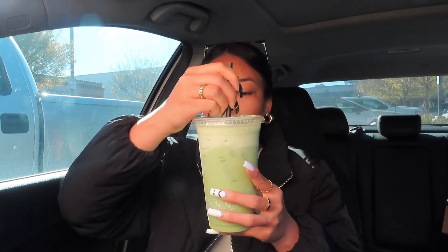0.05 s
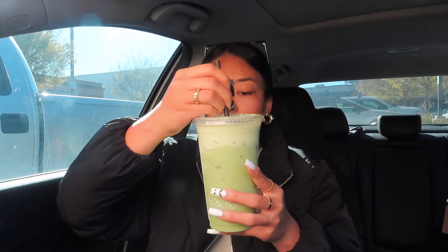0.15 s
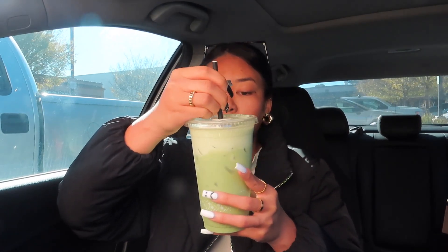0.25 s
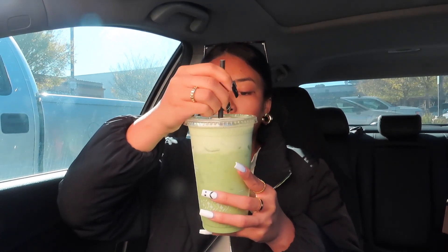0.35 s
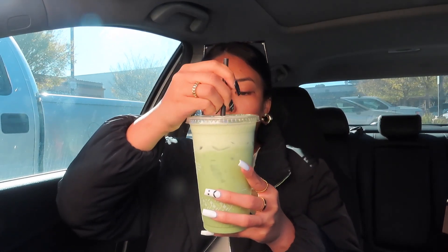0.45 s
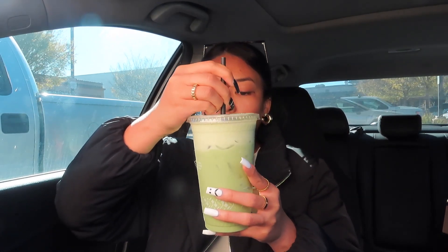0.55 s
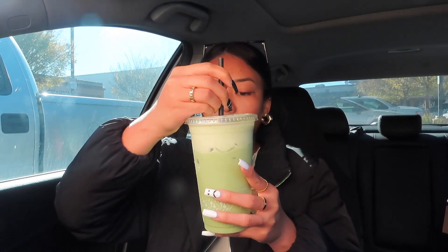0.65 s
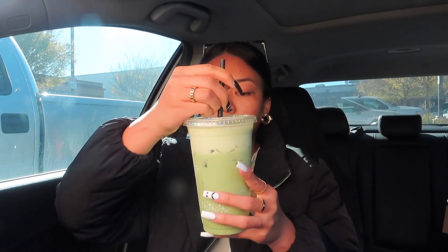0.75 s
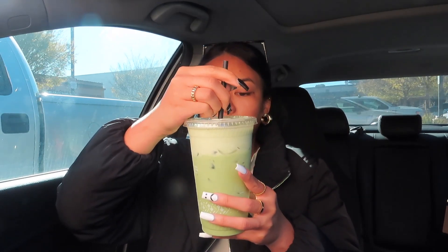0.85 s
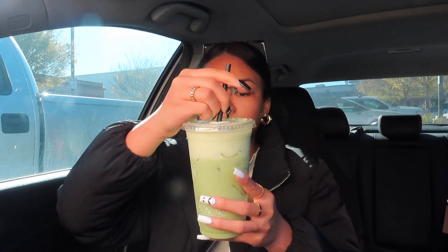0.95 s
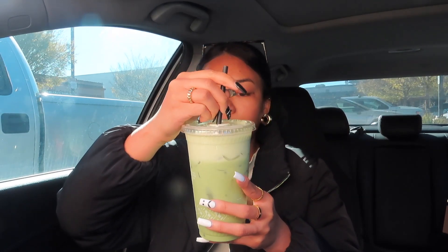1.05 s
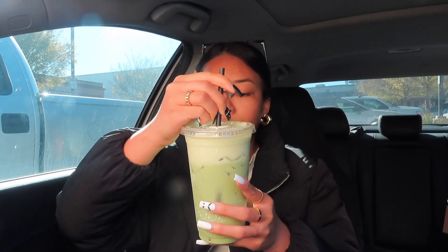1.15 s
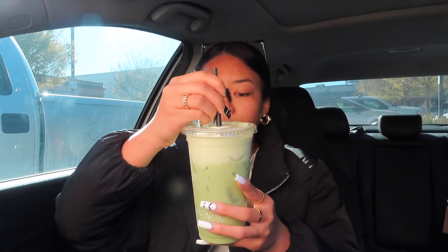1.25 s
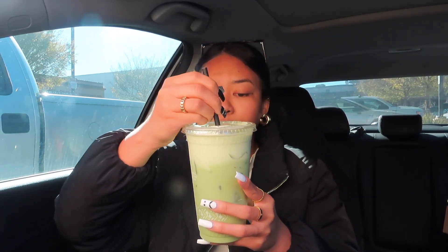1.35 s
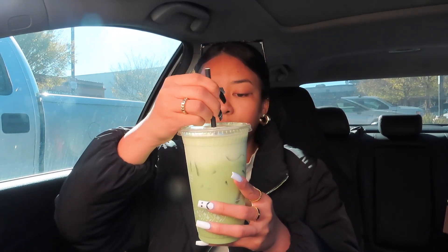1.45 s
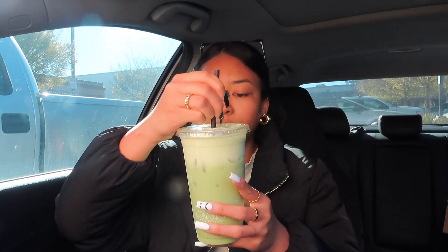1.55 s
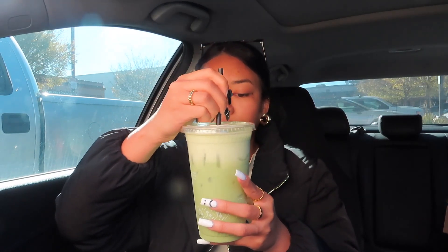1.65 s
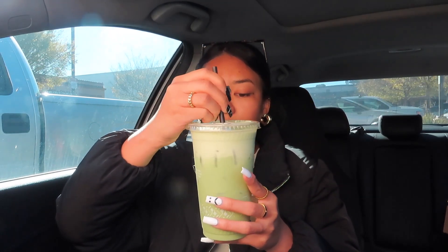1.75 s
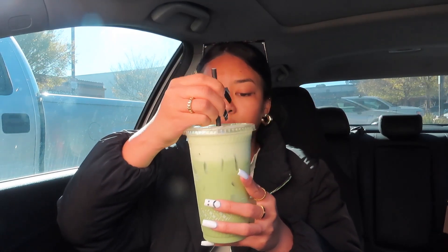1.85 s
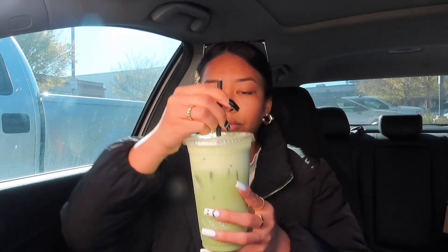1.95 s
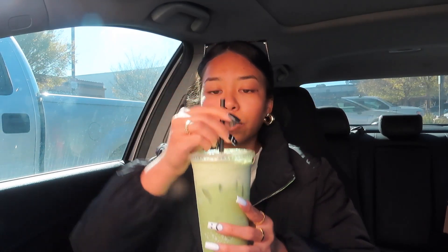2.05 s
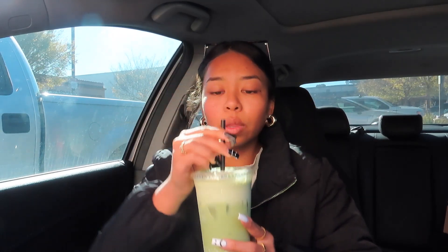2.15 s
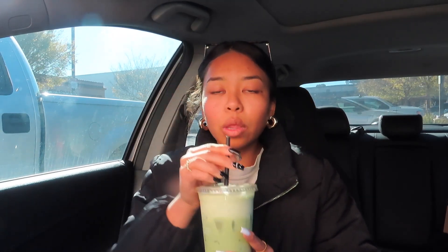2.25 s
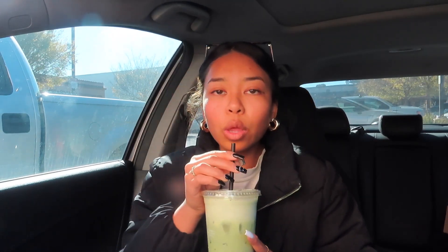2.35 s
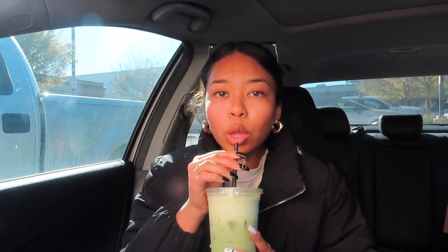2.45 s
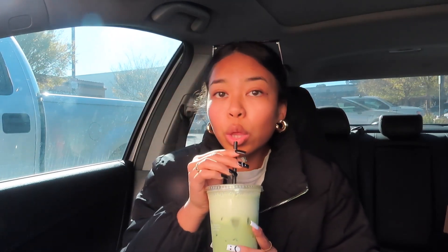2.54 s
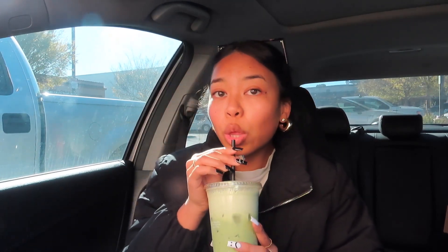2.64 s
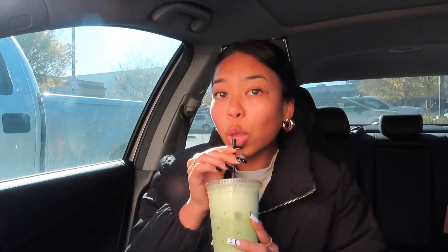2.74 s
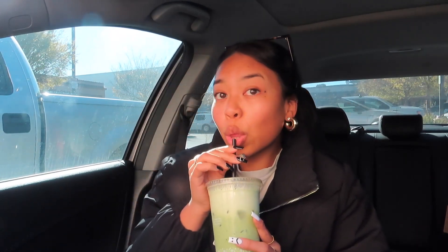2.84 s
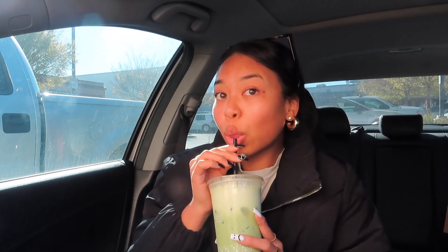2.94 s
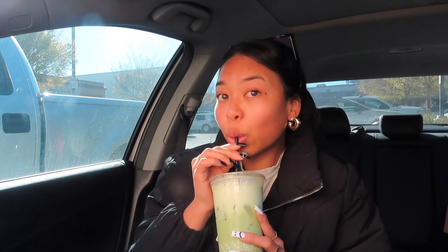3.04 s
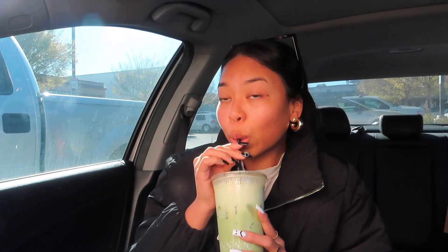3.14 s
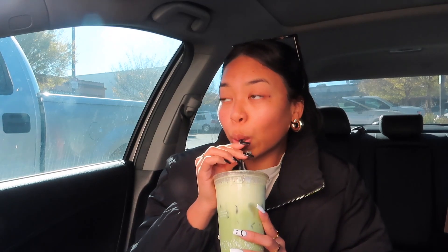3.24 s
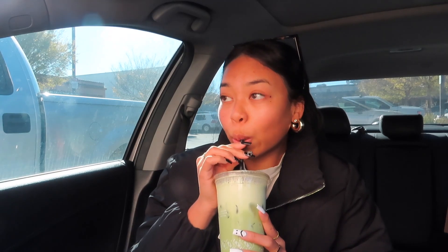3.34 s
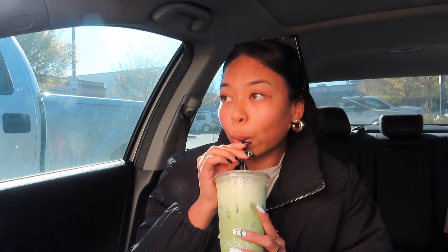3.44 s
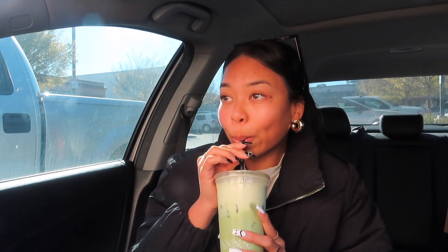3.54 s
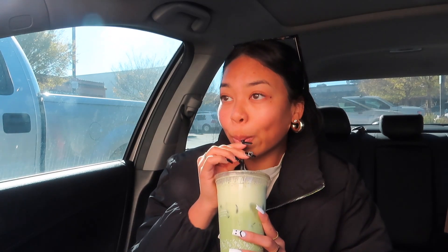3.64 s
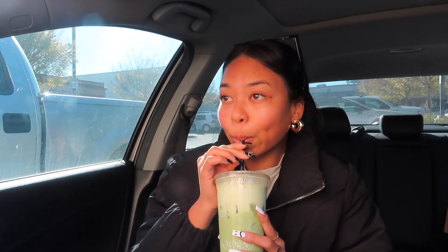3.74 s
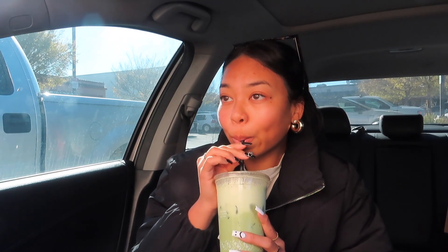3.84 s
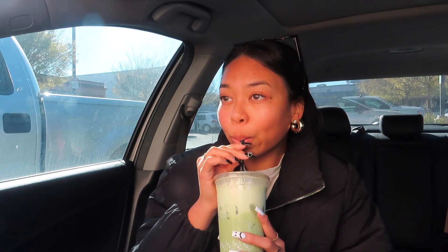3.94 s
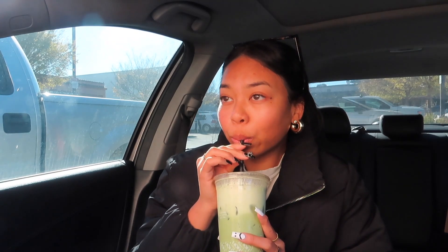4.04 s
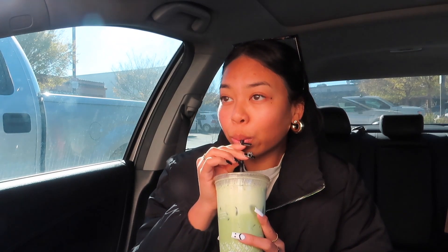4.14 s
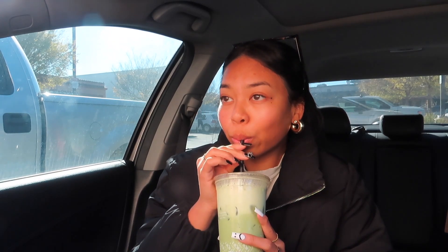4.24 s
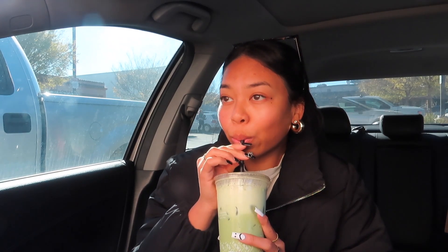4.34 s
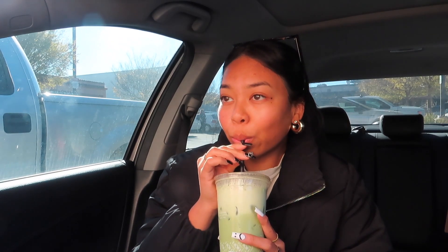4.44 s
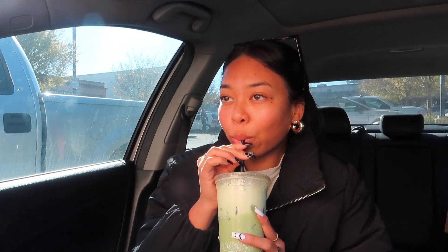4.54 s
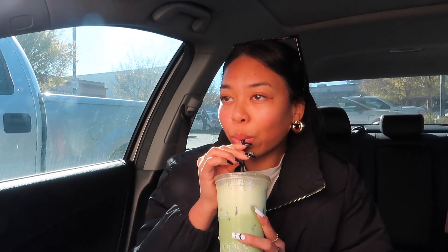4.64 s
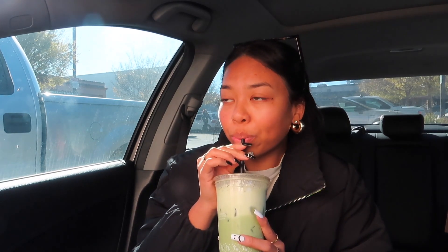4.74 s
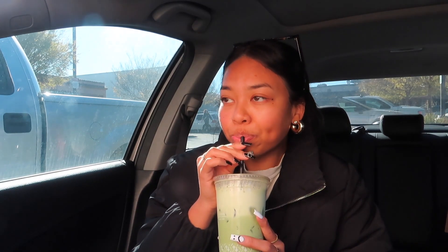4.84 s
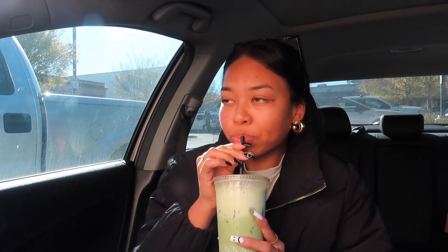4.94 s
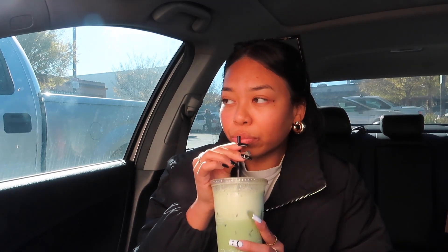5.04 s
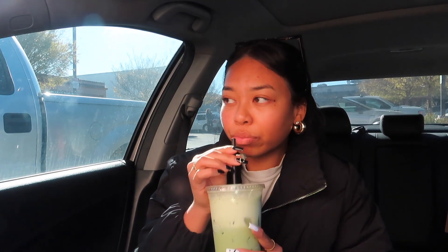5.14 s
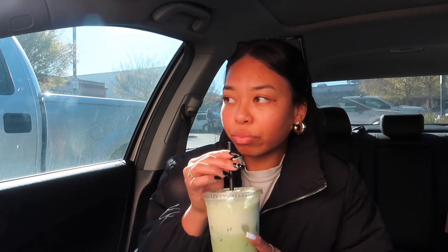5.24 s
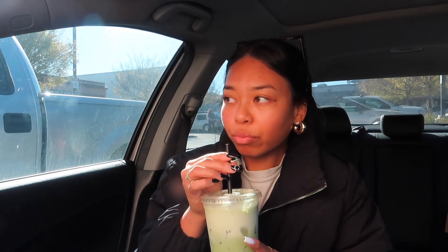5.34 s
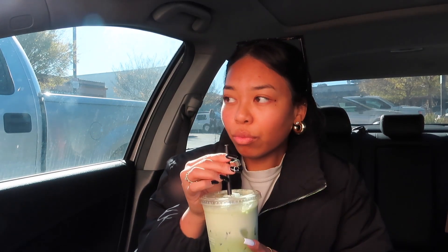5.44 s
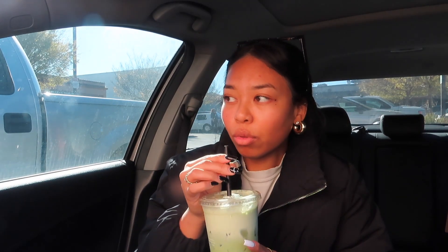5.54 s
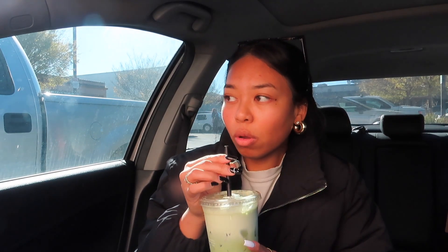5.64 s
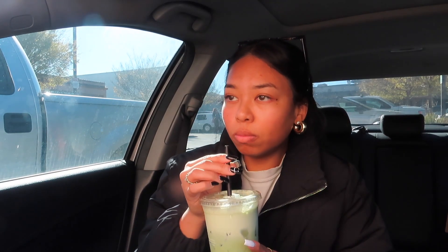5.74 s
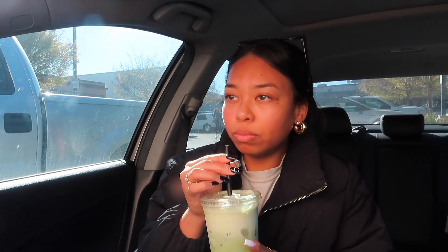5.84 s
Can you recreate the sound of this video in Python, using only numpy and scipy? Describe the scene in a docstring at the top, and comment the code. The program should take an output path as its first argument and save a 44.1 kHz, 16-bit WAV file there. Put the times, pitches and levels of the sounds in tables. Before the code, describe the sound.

Close-up stirring of an iced drink in an idling parked car, with straw creaks, fading ice, then quiet, cloth rustle and lips parting.

```python
"""Stirring an iced drink in an idling car

An iced drink is stirred with a straw in a lidded plastic cup, heard close by in a parked, idling car.
Colliding ice drives resonances of the wall and the lid space; the straw sticks, slips and rings the lid.
The stirring dies away; after a sip, itself silent, the cup is lowered with rustling cloth, damped low
bumps and one more creak, and wet lips part. Engine orders and filtered noise lie beneath it all."""
import sys
import numpy as np
from scipy import signal
from scipy.fft import rfft, irfft, next_fast_len
from scipy.io import wavfile
from scipy.ndimage import uniform_filter1d

SR = 44100
rng = np.random.default_rng(int(sys.argv[2]) if len(sys.argv) > 2 else 0)


def put_to_file(sound):
    """Save the sound as 16-bit audio at rate SR, in the file named by the first command-line argument."""
    columns = np.atleast_2d(sound).T  # one column per channel
    safe = np.clip(columns, -1, 1)
    whole_steps = np.round(safe * 32767)
    wavfile.write(sys.argv[1], SR, whole_steps.astype(np.int16))


N = 259749
TAPS = 4096  # length of a single short sound, in samples
BINS = np.fft.rfftfreq(TAPS, 1 / SR)
TIME = np.arange(N) / SR

# Spectrum of ice rubbing on ice. Each row: frequency in Hz, relative density in dB per Hz.
ICE_SPECTRUM = [(200, -6.5), (700, -5.5), (1300, -3.5), (1800, -2.5), (2050, -4.5), (2800, -2),
                (3500, -3.5), (4500, -8.5), (5600, -13), (7000, -20.5), (8200, -33.5), (11000, -36.5),
                (15500, -66)]


def amp(db):
    """Inverts the level definition: an amplitude ratio is 10 to the power dB / 20."""
    return 10 ** (np.asarray(db) / 20)


def unit(x):
    """Normalizes by the root mean square, to rms 1."""
    return x / np.sqrt(np.mean(x ** 2) + 1e-20)


def read(points, hz):
    """Interpolates a spectrum linearly in value over logarithmic frequency."""
    f, value = np.transpose(points)
    return np.interp(np.log(hz + 1), np.log(f + 1), value)


def add(mix, s, sound):
    """Superposes a sound on the mix from time s in seconds."""
    part = mix[max(round(s * SR), 0):][:len(sound)]
    part += sound[:len(part)]


def colour(x, points):
    """Filters by multiplication in the frequency domain with (Hz, dB) points."""
    size = next_fast_len(len(x) + TAPS)
    gain = amp(read(points, np.fft.rfftfreq(size, 1 / SR)))
    return irfft(rfft(x, size) * gain, size)[:len(x)]


def lifts(rings):
    """Sums the Lorentzian gain in dB of resonances (Hz, width in Hz, lift in dB)."""
    total_db = 0
    for hz, width, db in rings:
        lorentzian = 1 / (1 + (2 * (BINS - hz) / width) ** 2)
        total_db = total_db + 10 * np.log10(1 + (amp(db) ** 2 - 1) * lorentzian)
    return total_db


def wander(length, count):
    """Band-limited interpolation of count random values gives a smooth line of rms 1."""
    return unit(signal.resample(rng.standard_normal(count), length))


def octaves(centre_hz=3000):
    """Logarithmic pitch distance of every bin from the centre, constant more than an octave below."""
    return np.log2(np.maximum(BINS, centre_hz / 2) / centre_hz)


def click(db, smear_s=0.00054):
    """Minimum-phase impulse response of a body with this dB spectrum, blurred by dispersion."""
    log_gain = np.log(amp(np.maximum(db, -100)))
    circle = np.concatenate([log_gain, log_gain[-2:0:-1]])
    # the Hilbert transform of the log gain gives the phase of a sharp start
    causal = np.exp(np.conj(signal.hilbert(circle)))[:len(BINS)]
    # bending waves cross the thin wall at their own speed for each frequency
    delay = smear_s * abs(wander(len(BINS), count=30))
    dispersion = np.exp(-2j * np.pi * np.cumsum(delay) * BINS[1])
    sound = irfft(causal * dispersion)
    return np.roll(sound, 10) * np.cos(np.linspace(0, np.pi / 2, TAPS))


def tap(db, peak_db, smear_s):
    """An impulsive blow: the impulse response scaled to a given peak."""
    sound = click(db, smear_s)
    return amp(peak_db) * sound / abs(sound).max()


def rub(db, peak_db, length_s, rise_s):
    """Friction excitation: a swelling and decaying burst of tiny catches drives the body."""
    t = TIME[:TAPS]
    catches = rng.standard_normal(TAPS) * (1 - np.exp(-t / rise_s)) * np.exp(-t / length_s)
    sound = signal.fftconvolve(catches, click(db))
    return amp(peak_db) * sound / abs(sound).max()


def modal(modes, detune):
    """Modal superposition: resonances (Hz, width, dB) struck together; the grip shifts each a little."""
    total = 0
    for hz, width, db in modes:
        hz = hz * (1 + detune * rng.standard_normal())
        damping = 1j * BINS * width
        total = total + amp(db) * damping / (hz ** 2 - BINS ** 2 + damping)
    return 20 * np.log10(abs(total) + 1e-2)


def background():
    """Partially coherent noise: rumble mostly common to both channels, a vent tone and separate hiss."""
    # Cabin noise. Each row: frequency in Hz, relative density in dB per Hz.
    cabin_spectrum = [(21, -40), (35, -2), (54, -13.5), (125, -16.5), (179, -18.5), (203, -21.5),
                      (283, -21), (314, -27.5), (338, -21), (426, -29), (460, -25), (785, -39.5),
                      (892, -34.5), (1690, -36.5), (15500, -58.5)]
    # Slope of the hiss at the very top. Each row: frequency in Hz, gain in dB.
    hiss_top = [(10000, 3), (13000, -3.5), (15500, -3)]
    # Left-right likeness. Each row: frequency in Hz, correlation from 0 to 1.
    likeness = [(60, 1), (130, .97), (290, 0.4), (640, 0.18), (1400, 0.1), (3100, 0.4), (7000, 0.37)]
    hz = np.fft.rfftfreq(N, 1 / SR)
    vent_db = np.interp(hz, BINS, lifts([(784, 29, 15.8)]))
    gain = amp(read(cabin_spectrum, hz) + read(hiss_top, hz) + vent_db)
    same = np.clip(read(likeness, hz), 0, 1)
    mid = rfft(rng.standard_normal(N)) * gain * np.sqrt(1 + same)
    side = rfft(rng.standard_normal(N)) * gain * np.sqrt(1 - same)
    return amp(-43) * unit(irfft([mid + side, mid - side], N))


def idle():
    """Engine orders: harmonics of a slightly unsteady firing rate."""
    # Engine orders. Each row: multiple of the firing rate, rms level in dB.
    orders = [(1, -40.5), (2, -45), (3, -49), (4, -55), (6, -56), (7, -59)]
    firing_hz = 28.6
    turns = np.cumsum(firing_hz * (1 + 0.00887 * wander(N, count=30))) / SR
    out = np.zeros(N)
    for k, db in orders:
        level = np.sqrt(2) * amp(db + 0.17 * wander(N, count=40))
        out += level * np.sin(2 * np.pi * (round(k) * turns + rng.random()))
    return out


def effort():
    """Drive level of the ice in dB: spells of stirring with exponential decay, then fainter settling."""
    # Three spells of stirring; between them the straw pauses or sticks in the lid.
    # Each row of a spell: time in seconds, effort in dB.
    spells = [
        [(0.0, -29.5), (0.16, -32), (0.304, -26.5), (0.376, -32.5), (0.52, -38), (0.6, -36.5)],
        [(0.68, -44.5), (0.7, -41), (0.885, -40), (0.93, -31.5), (1.04, -42.5), (1.13, -41.5)],
        [(1.265, -32.5), (1.376, -28), (1.64, -29.5), (1.668, -32), (1.73, -28), (1.8, -30.5), (1.89, -32.5),
         (1.945, -34), (2.072, -40), (2.13, -39), (2.37, -43.5), (2.69, -49)],
    ]
    rest_db_per_s = 217  # the ice comes to rest this fast when the straw stops
    # ice goes on settling, ever more faintly
    settle_from_s, settle_to_s, settle_db, settle_db_per_s = 2.74, 3.03, -49.5, 7
    settle_end_db = settle_db - settle_db_per_s * (settle_to_s - settle_from_s)
    settling = [(settle_from_s, settle_db), (settle_to_s, settle_end_db)]
    level = np.full(N, -90.)
    for rows in [*spells, settling]:
        s, db = np.transpose(rows)
        outside_s = np.maximum(s[0] - TIME, 0) + np.maximum(TIME - s[-1], 0)
        level = np.maximum(level, np.interp(TIME, s, db) - rest_db_per_s * outside_s)
    return level + 1.4 * wander(N, count=260)  # the hand moves unevenly, in dB


def tumbling(stir_db):
    """Energy addition: churn and crunch in dB follow the effort, and jammed cubes add bursts as they tumble."""
    # Cubes give way. Each row: start in seconds, length in seconds, relative crunch level in dB,
    # relative push on the cup wall in dB.
    tumbles = [(0.047, 0.045, -29.5, -36), (0.174, 0.023, -27, -29.5), (0.219, 0.11, -30, -32),
               (0.775, 0.05, -39, -35.5), (0.931, 0.075, -33.5, -35), (1.543, 0.1, -30.5, -35),
               (1.686, 0.015, -23, -24.5), (1.846, 0.011, -20, -24), (1.875, 0.031, -27, -22.5),
               (1.966, 0.023, -29.5, -34), (2.014, 0.062, -29, -35.5), (2.198, 0.14, -41, -45.5),
               (2.82, 0.0097, -43, -66), (2.902, 0.02, -44, -66), (3.162, 0.04, -52.5, -59)]
    attack_s, t60_s = 0.0048, 0.093
    # the churn falls faster than the effort: dB per dB below a firm stroke in dB
    churn_follows, firm_db = 1.1, -31.5
    churn = amp(firm_db + churn_follows * (stir_db - firm_db) + 1) ** 2
    crunch = amp(stir_db - 1) ** 2
    for s, length, crunch_db, wall_db in tumbles:
        attack = np.clip((TIME - s) / attack_s, 0, 1)
        burst = attack * amp(-60 * np.maximum(TIME - s - length, 0) / t60_s)
        churn = churn + (amp(wall_db) * burst) ** 2
        crunch = crunch + (amp(crunch_db) * burst) ** 2
    return 10 * np.log10(churn), 10 * np.log10(crunch)


def rattle(body_db, level_db, per_s, spread_db, vary_db, tilt_db, bend, count=24):
    """Random collisions follow the straw round the cup; each contact point detunes the body a little."""
    stir_turns_per_s = 2.6
    size = amp(spread_db * np.minimum(rng.exponential(1, N), 4)) * rng.choice([-1, 1], N)
    size = size * (rng.random(N) < per_s / SR)
    # collisions scatter over half a turn ahead of the circling point
    contact = np.floor(count * (stir_turns_per_s * TIME + rng.random(N) / 2)) % count
    out = np.zeros(N)
    for k in range(count):
        stretch = 1 + bend * np.sin(2 * np.pi * k / count)
        body = np.interp(BINS / stretch, BINS, body_db)
        uneven_db = vary_db * wander(len(BINS), count=36)
        bright_db = tilt_db * rng.uniform(-0.14, 1) * octaves()
        grain = click(body + uneven_db + bright_db, smear_s=0.000603)
        out += signal.oaconvolve(size * (contact == k), unit(grain))[:N]
    # the stroke of the straw sets how much energy the collisions share
    power = abs(uniform_filter1d(out ** 2, size=1200))
    return amp(level_db) * out / np.sqrt(power + power.mean() / 100)


def slosh(level_db, count=28, cycles=14, glide=0.11):
    """Bubble resonance: small bubbles close behind the cubes, ring briefly and rise in pitch."""
    per_s, low_hz, high_hz = 150, 600, 3170
    t, out = TIME[:TAPS], np.zeros(N)
    size = rng.random(N) ** 2 * (rng.random(N) < per_s / SR)
    which = rng.integers(0, count, N)
    for k, hz in enumerate(np.geomspace(low_hz, high_hz, count)):
        age = t * hz / cycles
        envelope = (1 - np.exp(-t * hz)) * np.exp(-2 * age)
        ring = envelope * np.sin(2 * np.pi * hz * t * (1 + glide * age / 2))
        out += signal.oaconvolve(size * (which == k), unit(ring))[:N]
    return amp(level_db - 10.5) * unit(out)


def knocks():
    """Impact of rigid bodies: the hardest single ice knocks are dispersed impulses of varied brightness."""
    # Each row: start in seconds, relative peak in dB, brightness in dB per octave.
    hard_knocks = [(0.056, -6.5, -0.5), (0.131, -12.5, 0.5), (0.189, -14, 0), (0.234, -20, 5),
                   (0.349, -13, -4.5), (0.427, -22, -1), (0.488, -8.5, 0.5), (0.5941, -17.5, 4),
                   (0.644, -19.5, -1), (0.726, -19.5, -0.5), (0.8613, -25, 8), (0.905, -23, 6),
                   (0.9313, -17.5, 3), (0.9645, -13, 2.5), (0.9864, -14, 3), (1.008, -19.5, 3),
                   (1.306, -15.5, -2.5), (1.4654, -17.5, 5.5), (1.506, -7.5, -6), (1.572, -16, 6),
                   (1.585, -7, 0), (1.6159, -9, 2), (1.65, -16.5, 1), (1.6826, -6.5, 2),
                   (1.705, -6.5, -1.5), (1.7226, -12.5, 0), (1.8589, -8.5, -7), (1.8866, -12, -7),
                   (2.0402, -10.5, -5), (2.297, -29, 13), (2.7449, -22, 6)]
    # Sound of a single knock. Each row: frequency in Hz, relative density in dB per Hz.
    knock_spectrum = [(200, -6), (900, 3.5), (1200, -12.5), (1700, 7), (2100, -4.5), (3000, 2.5),
                      (4500, -2.5), (5400, -4.5), (6000, -14), (7000, -14), (8300, -26), (11000, -30),
                      (15500, -53)]
    out = np.zeros(N)
    for s, db, bright_db in hard_knocks:
        uneven_db = 2 * wander(len(BINS), count=44)
        body = read(knock_spectrum, BINS) + bright_db * octaves() + uneven_db
        add(out, s, tap(body, db - 2.5, smear_s=0.001007))
    return out


def thuds(wall):
    """Cushioned impact: cubes bump the cup wall through the drink, exciting its resonances."""
    # Each row: start in seconds, relative peak in dB.
    wall_thuds = [(0.083, -19), (0.238, -13), (0.29, -12.5), (0.492, -19.5), (0.695, -28), (0.934, -15.5),
                  (1.383, -14), (1.75, -14.5), (2.18, -23.5), (2.429, -33)]
    out = np.zeros(N)
    for s, db in wall_thuds:
        add(out, s, rub(wall, db, length_s=0.0015, rise_s=0.0006))
    return out


def clinks():
    """Brief friction excites one resonance as single cubes clink and rub past each other."""
    # Each row: start in seconds, relative peak in dB, pitch in Hz.
    cube_clinks = [(0.563, -22, 2420), (0.778, -20.5, 2560), (1.332, -12.5, 2350), (1.629, -14, 2270),
                   (2.162, -29, 2250), (2.2208, -23.5, 2490), (2.2361, -24, 2320), (2.2837, -27.5, 2540),
                   (2.3882, -29, 2300), (2.398, -23.5, 2250), (2.4117, -21, 2510), (2.427, -24, 2390),
                   (2.4771, -24.5, 2620), (2.4921, -21, 2430), (2.533, -26.5, 2420), (2.973, -30.5, 2400)]
    out = np.zeros(N)
    for s, db, hz in cube_clinks:
        body = read(ICE_SPECTRUM, BINS) - 4 * octaves() + lifts([(hz, 260, 11)])
        add(out, s, rub(body, db, length_s=0.003, rise_s=0.00045))
    return out


def ice():
    """Collision noise: cubes churn on the wall and crunch on each other; hard strokes add splinters."""
    # The filled cup. Each row: frequency in Hz, relative density in dB per Hz.
    cup_spectrum = [(60, -35), (130, -1), (200, 0.5), (340, 1.5), (450, -5), (750, -2.5), (1050, 0.5),
                    (1270, -10), (1600, 0), (2000, -10.5), (3000, -6), (6000, -53)]
    # Cup wall resonances. Each row: frequency in Hz, width in Hz, lift in dB.
    wall_rings = [(547, 130, 12.8), (799, 32, 6.7), (948, 38, 16.7), (1370, 170, 8.3)]
    # Resonances of the space under the lid. Each row: frequency in Hz, width in Hz, lift in dB.
    hollow_rings = [(1730, 160, 5.2), (2275, 51, 8.1), (2540, 400, 7.1), (4050, 440, 1.7)]
    churn_db, crunch_db = tumbling(effort())
    cubes = read(ICE_SPECTRUM, BINS) + lifts(hollow_rings)
    wall = read(cup_spectrum, BINS) + lifts(wall_rings)
    churn = rattle(wall, churn_db - 2.0, per_s=1100, spread_db=1.7, vary_db=3, tilt_db=0.0, bend=0.034)
    crunch = rattle(cubes - 3.5 * octaves(), crunch_db - 2.5,
                    per_s=800, spread_db=2.5, vary_db=5, tilt_db=1.5, bend=0.028)
    # bright splinters grow faster than the crunch
    splinters_db = 1.62 * (crunch_db + 27.0) - 37.5
    splinters = rattle(cubes + 4 * octaves(), splinters_db,
                       per_s=450, spread_db=-0.5, vary_db=3.5, tilt_db=0.0, bend=0.026)
    return churn + crunch + splinters + slosh(churn_db) + knocks() + thuds(wall) + clinks()


def straw():
    """Stick-slip and impact: each slip snaps the lid and rings the straw; its knocks ring the whole cup."""
    # Slips in the lid. Each row: start in seconds, relative peak in dB, ring of the straw in dB,
    # brightness in dB per octave.
    slips = [(1.0608, -4.5, 17, 2.5), (1.0737, -7, 13, -1), (1.084, -8, 19, 1.5), (1.0965, -10, 23, 0.5),
             (1.1083, -11.5, 21, 0), (1.1216, -9.5, 17, -0.5), (1.1515, -9.5, 17, 1), (1.201, -6, 16, -0.5),
             (1.237, -13.5, 14, -0.5), (1.253, -19, 18, -6), (5.3494, -10.5, 18, 1), (5.3505, -9.5, 25, -1)]
    # Modes of the lid. Each row: frequency in Hz, width in Hz, level in dB.
    lid_modes = [(366, 37, 22), (560, 136, 17), (912, 91, 26.5), (1516, 94, 25.5), (1697, 140, 29),
                 (1775, 42, 12), (2210, 180, 14), (2810, 116, 20), (3170, 220, 21), (4250, 350, 22.5),
                 (4630, 310, 14), (6620, 270, 24), (11300, 260, 17)]
    # How the snap of a slip drives the modes. Each row: frequency in Hz, gain in dB.
    snap = [(150, 12), (1000, 3.5), (5300, -1.5), (6200, -9.5), (7000, -16.5), (8800, -17.5), (15500, -28)]
    # Knocks on the cup. Each row: start in seconds, relative peak in dB, brightness in dB per octave.
    clacks = [(2.7174, -9.5, 0), (3.029, -11.5, -1)]
    # Modes of the cup struck through the straw. Each row: frequency in Hz, width in Hz, level in dB.
    cup_modes = [(370, 35, 25.5), (553, 120, 19), (760, 130, 20), (1410, 59, 20), (1753, 50, 27),
                 (1798, 80, 25.5), (2510, 330, 13), (3190, 340, 13), (3700, 100, 15), (4400, 130, 11),
                 (5000, 250, 7), (10800, 710, 4.5)]
    # How the blow drives the modes. Each row: frequency in Hz, gain in dB.
    blow = [(150, -2.5), (500, 2.5), (5000, 0), (6200, -5.5), (9000, -12), (11400, -9.5), (15500, -21)]
    straw_hz, straw_width_hz = 5320, 170
    out = np.zeros(N)
    for s, db, straw_db, bright_db in slips:
        lid = modal(lid_modes + [(straw_hz, straw_width_hz, straw_db)], detune=0.014)
        body = lid + read(snap, BINS) + bright_db * octaves()
        add(out, s, tap(body, db - 0.63, smear_s=0.00064))
    for s, db, bright_db in clacks:
        body = modal(cup_modes, detune=0.0063) + read(blow, BINS) + bright_db * octaves()
        add(out, s, tap(body, db + 0.8, smear_s=0.0012))
    return out


def traffic():
    """Low-pass transmission: of a motor outside only the lowest hum, a gliding sine, passes the windows."""
    # A distant motor swells and drops. Each row: time in seconds, frequency in Hz, peak level in dB.
    motor = [(3.1, 123.8, -59), (3.3, 124.5, -44), (3.45, 127, -54), (3.7, 144.2, -44),
             (3.88, 144.4, -45.5), (4.05, 120.7, -44.5), (4.25, 114.5, -51)]
    s, hz, db = np.transpose(motor)
    level_db = np.interp(TIME, s, db, left=-90, right=-90) + 2 * wander(N, count=90)
    return amp(level_db) * np.sin(2 * np.pi * np.cumsum(np.interp(TIME, s, hz)) / SR)


def pings(glide=0.077):
    """Cavity resonance: small air cavities ring, their pitch rising a little as they open."""
    # A bubble in the drink and the opening mouth. Each row: start in seconds, relative peak in dB,
    # starting pitch in Hz, 60 dB decay time in seconds.
    cavities = [(4.113, -45, 1690, 0.034), (5.6558, -21, 2575, 0.023)]
    out, t = np.zeros(N), TIME[:TAPS]
    for s, db, hz, t60 in cavities:
        envelope = (1 - np.exp(-t / 0.0018)) * amp(-60 * t / t60)
        tone = np.sin(2 * np.pi * hz * t * (1 + glide * t / t60 / 2))
        add(out, s, amp(db) * envelope / envelope.max() * tone)
    return out


def fingers():
    """Soft friction: fingers and straw brush the cup in blurred bursts around one resonance."""
    # Each row: start in seconds, relative peak in dB, pitch in Hz.
    brushes = [(4.776, -39.5, 800), (5.029, -39.5, 2370), (5.2, -43.5, 2540), (5.378, -45, 600),
               (5.41, -41, 700), (5.495, -36, 2140), (5.561, -42, 2430)]
    out = np.zeros(N)
    for s, db, hz in brushes:
        body = read(ICE_SPECTRUM, BINS) - 4 * octaves() + lifts([(hz, 450, 9)])
        add(out, s, rub(body, db, length_s=0.0072, rise_s=0.0016))
    return out


def sleeve():
    """Friction noise: padded cloth slides in uneven brushes as the cup is lowered."""
    # Each row: time in seconds, relative level in dB.
    rustle = [(5.15, -48), (5.24, -45), (5.33, -40), (5.42, -39), (5.5, -43), (5.58, -50), (5.7, -67)]
    # Colour of the cloth. Each row: frequency in Hz, relative density in dB per Hz.
    cloth = [(100, 19.5), (250, -9), (500, 3.5), (900, -5), (2500, -14), (5000, -24), (12000, -52)]
    level_db = np.interp(TIME, *np.transpose(rustle), left=-100, right=-100) + 3 * wander(N, count=500)
    return amp(level_db - 2.0) * unit(colour(rng.standard_normal(N), cloth))


def bumps():
    """Heavily damped oscillation: low thuds pass through the seat as the arm comes down."""
    # Each row: start in seconds, envelope peak in dB, frequency in Hz.
    arm_bumps = [(5.289, -25.5, 52.4), (5.324, -24.5, 40.6), (5.349, -26, 78), (5.379, -32, 72),
                 (5.416, -25.5, 70), (5.477, -28.5, 47.6), (5.536, -32, 42.4)]
    out, t = np.zeros(N), TIME[:SR // 4]
    age = t / 0.0095
    for s, db, hz in arm_bumps:
        add(out, s, amp(db) * age * np.exp(1 - age) * np.sin(2 * np.pi * hz * t))
    return out


def lips():
    """Rupture noise: a wet film tears in a few quick, decaying spurts as the lips part."""
    # Each row: start in seconds, relative peak in dB.
    smacks = [(5.652, -25), (5.6527, -18.5), (5.657, -26), (5.661, -19.5)]
    # Colour of the lips. Each row: frequency in Hz, relative density in dB per Hz.
    lip_spectrum = [(300, -9), (950, -19), (1200, 7), (2000, 0), (3800, -2), (4500, -8), (6000, -12),
                    (6700, 5), (7400, 2.5), (8800, -6), (10300, 5), (12500, -3), (14000, -18), (15300, -14)]
    out, t = np.zeros(N), TIME[:TAPS]
    for s, db in smacks:
        tear = rng.standard_normal(TAPS) * np.exp(-t / 0.0041)
        sound = signal.fftconvolve(tear, click(read(lip_spectrum, BINS)))
        add(out, s, amp(db) * sound / abs(sound).max())
    return out


def scatter(hold_s, t60):
    """Diffuse reflection: dense echoes of energy 1 favour no band, keep up for hold_s, then die away."""
    t = TIME[:TAPS]
    fade = amp(-60 * np.maximum(t - hold_s, 0) / t60) * (t > .002)
    taps = rfft(rng.standard_normal(TAPS) * fade)
    flat = taps / np.sqrt(uniform_filter1d(abs(taps) ** 2, size=9))
    even = irfft(flat) * np.minimum(fade * 2, 1)
    return even / np.linalg.norm(even)


def cabin(x, count=6):
    """Early and late reflection: near glass answers in a burst, the rest of the cabin faintly."""
    glass_db, glass_hold_s, glass_t60_s, cabin_echo_db = -8.5, 0.012, 0.05, -17.5
    mid = x.copy()
    reflected = colour(x, [(2000, 0.83), (6000, 0.16), (14000, 1.3)])
    # several random echo tails are blended in slowly changing shares
    shares = np.array([wander(N, count=50) for _ in range(count)])
    for share in shares / np.linalg.norm(shares, axis=0):
        glass = amp(glass_db) * scatter(glass_hold_s, glass_t60_s)
        echoes = glass + amp(cabin_echo_db) * scatter(hold_s=0, t60=0.19)
        mid += signal.oaconvolve(reflected * share, echoes)[:N]
    return mid


def sideways(x):
    """Decorrelation: diffuse echoes form the part that differs between the channels, mostly treble."""
    # Side against mid. Each row: frequency in Hz, gain in dB.
    width = [(60, -42), (200, -42), (380, -30), (700, -49), (2400, -36), (4400, -18), (8100, -9),
             (14000, 0)]
    return colour(signal.oaconvolve(x, scatter(hold_s=0.0014, t60=0.072))[:N], width)


def scene():
    """Superposition: the cup, the lips and the sleeve in the cabin, over the idling car."""
    # level of the lid and cup sounds in the channel difference, against the rest
    lid_side_db = 7
    small = ice() + pings() + lips() + sleeve() + fingers()
    lid = straw()
    mid = cabin(small + lid)
    side = sideways(small + amp(lid_side_db) * lid)
    near = amp(0.5) * np.array([mid + side, mid - side])
    return near + bumps() + idle() + traffic() + background()


def record(dry):
    """Band limitation: a linear-phase low-pass removes the extreme treble."""
    edge_hz = 15900
    low_pass = signal.firwin(511, edge_hz, window=("kaiser", 9), fs=SR)
    return signal.oaconvolve(dry, low_pass[None], "same")


dry = scene()
out = record(dry)
put_to_file(out)
```